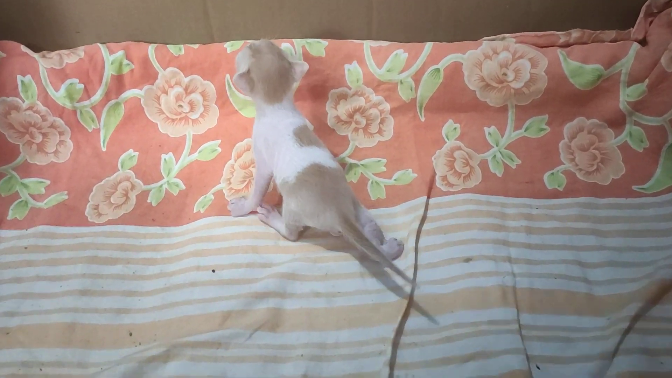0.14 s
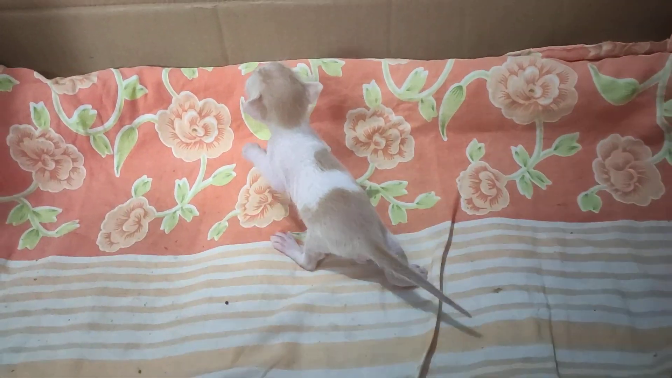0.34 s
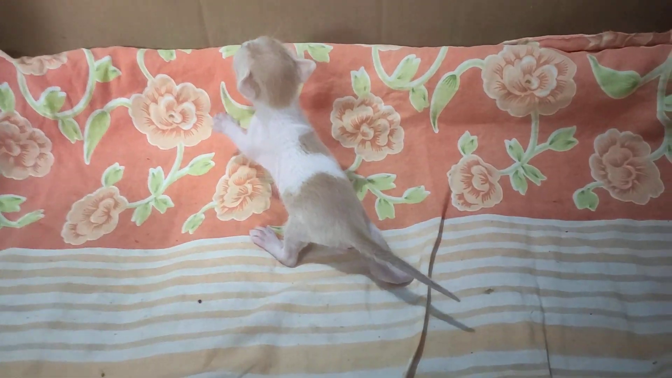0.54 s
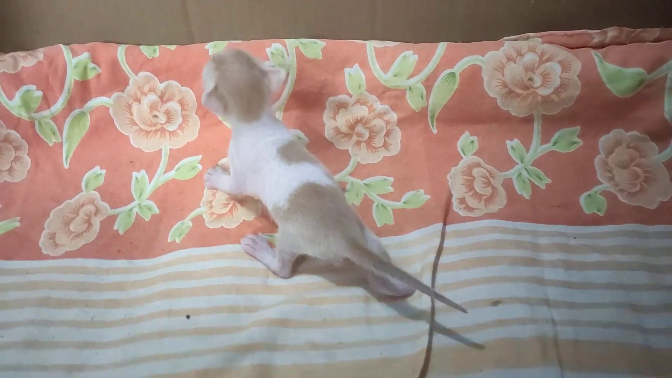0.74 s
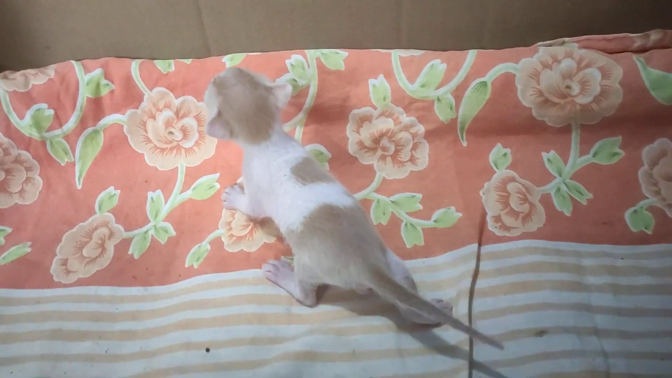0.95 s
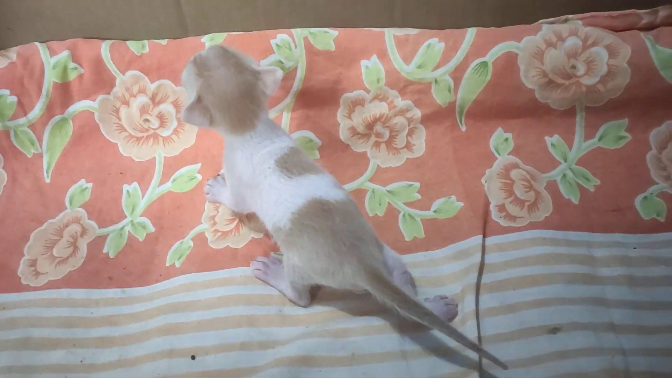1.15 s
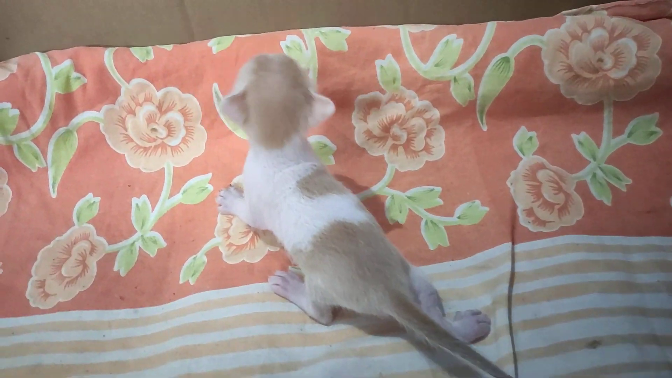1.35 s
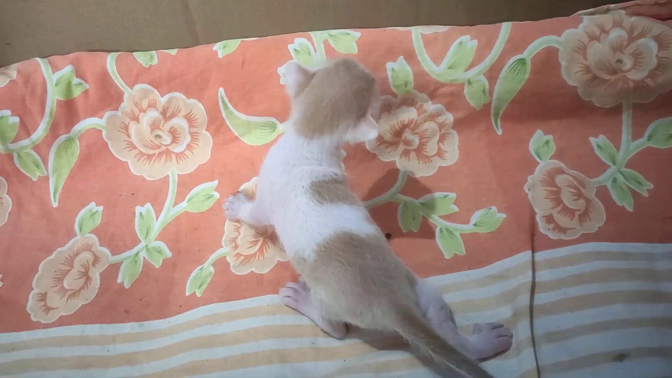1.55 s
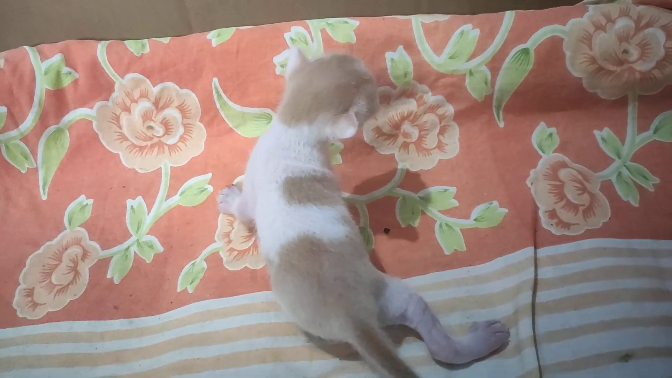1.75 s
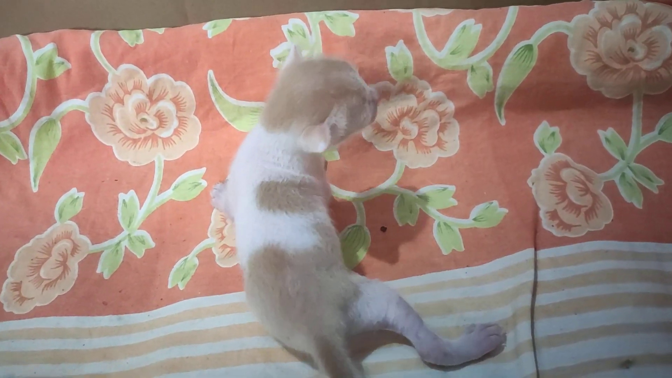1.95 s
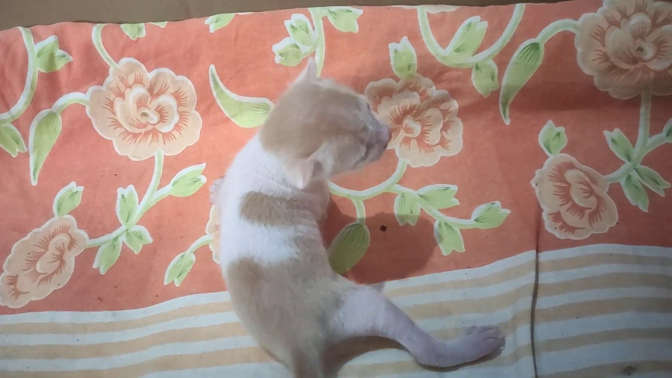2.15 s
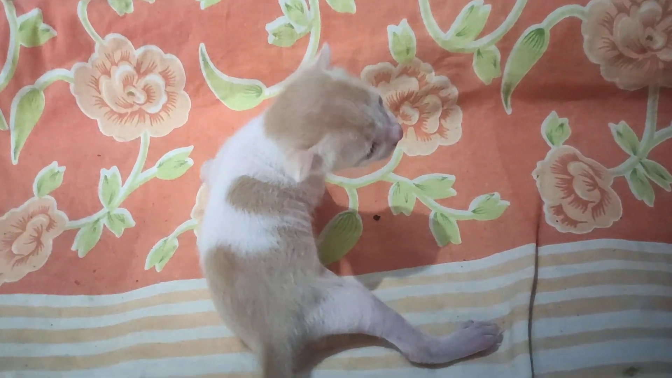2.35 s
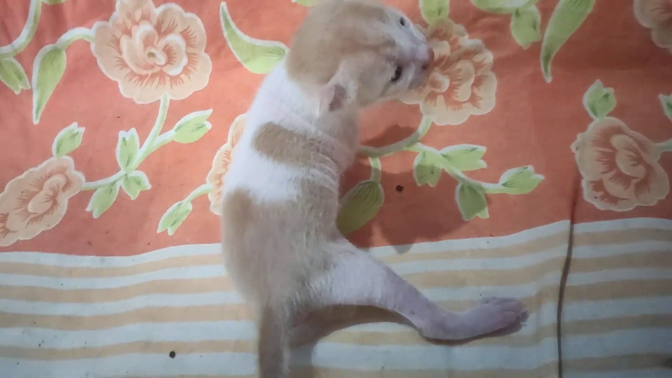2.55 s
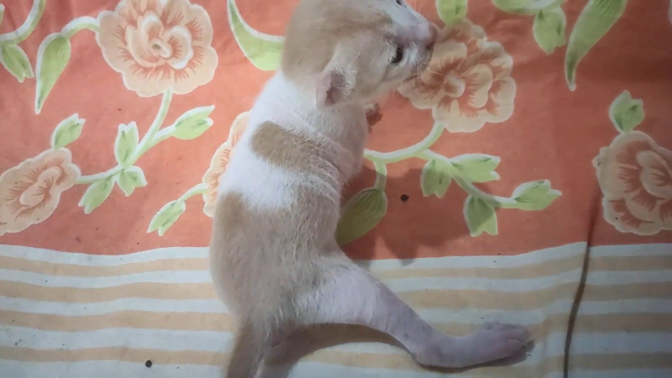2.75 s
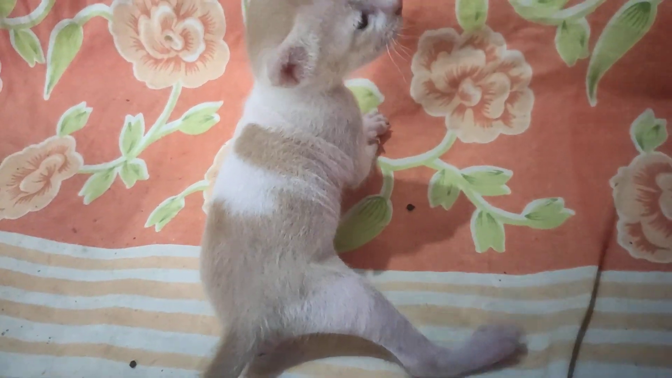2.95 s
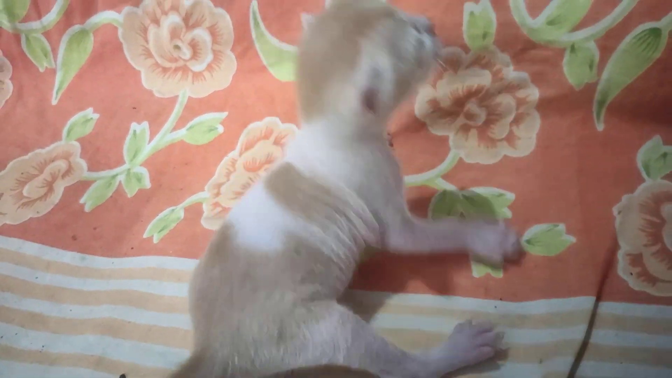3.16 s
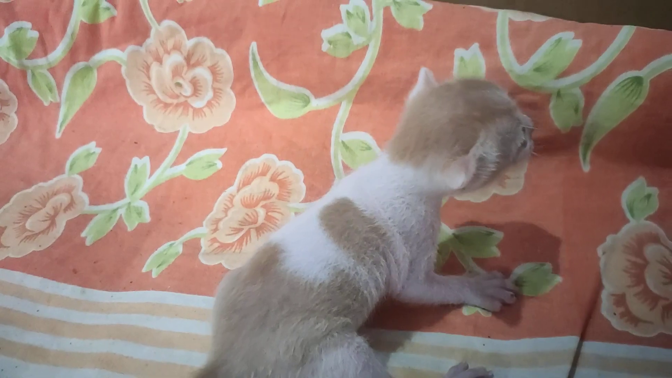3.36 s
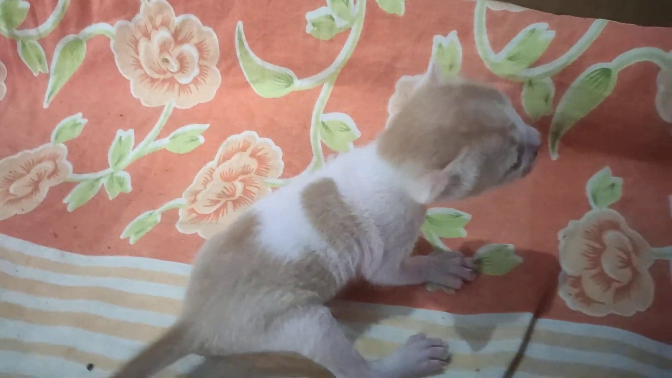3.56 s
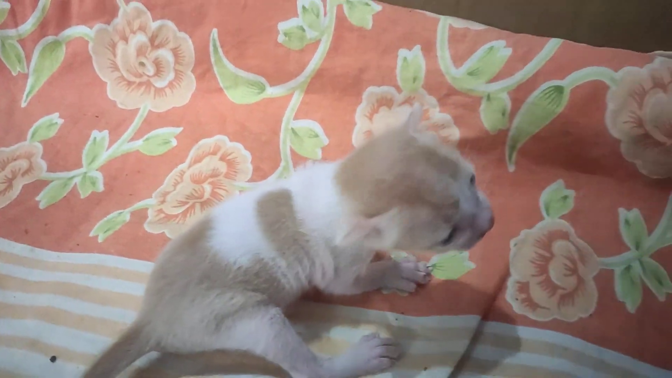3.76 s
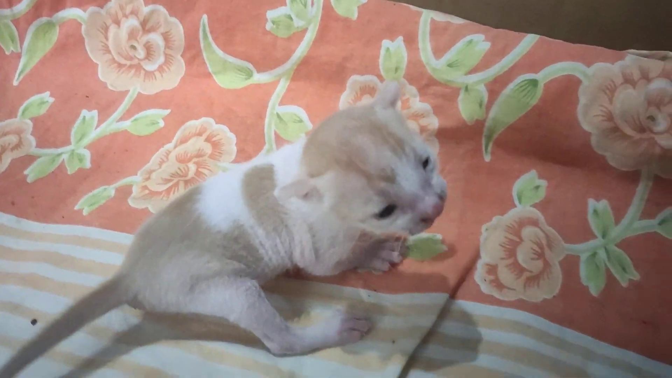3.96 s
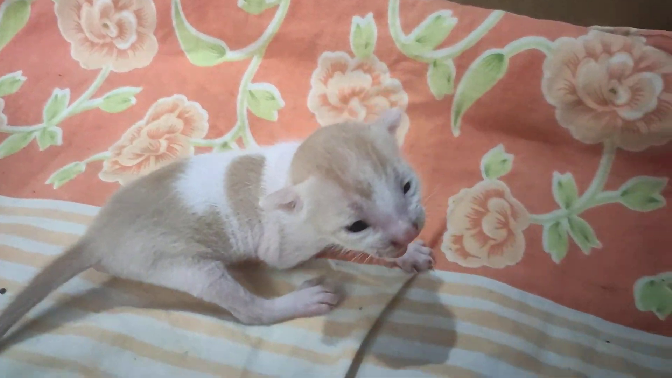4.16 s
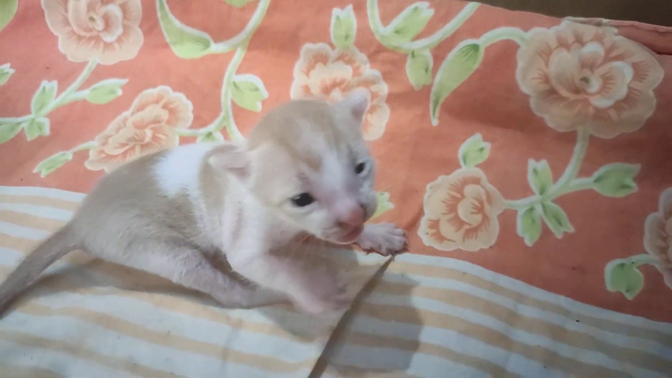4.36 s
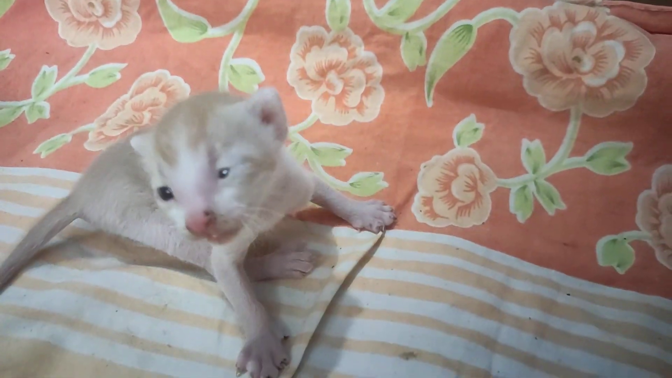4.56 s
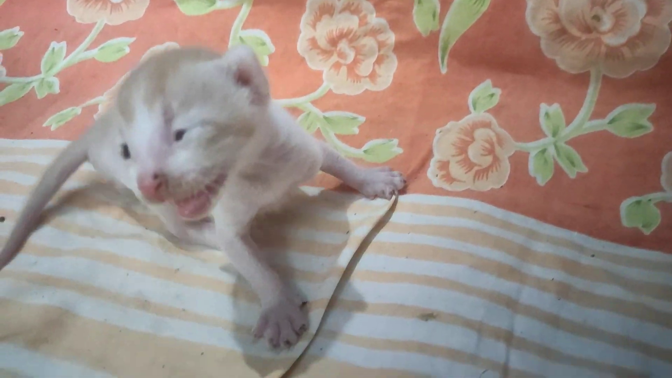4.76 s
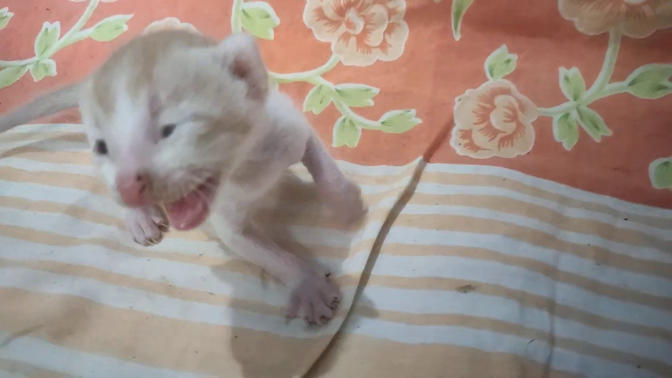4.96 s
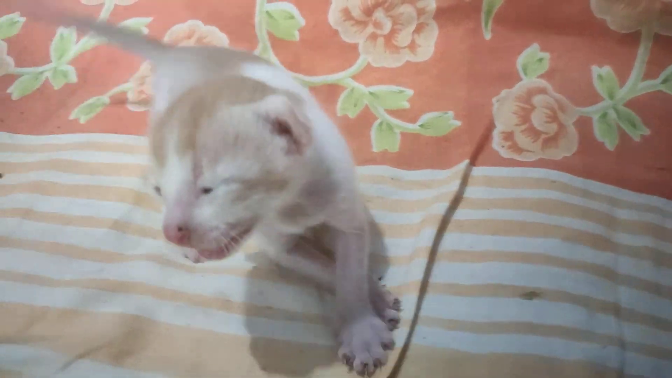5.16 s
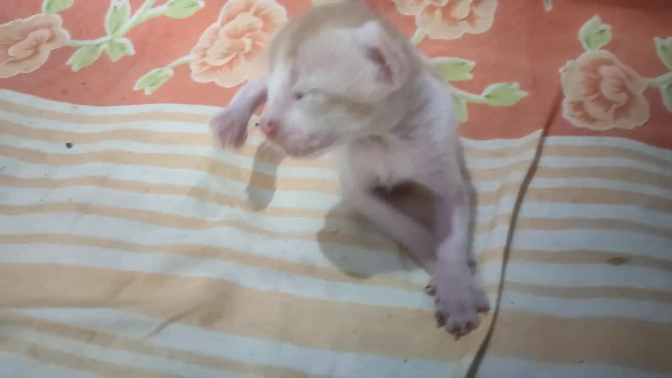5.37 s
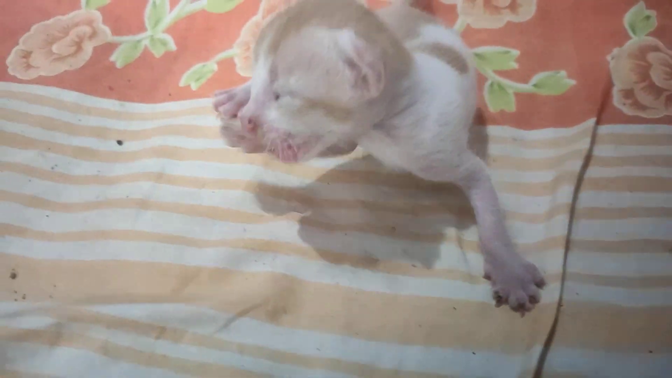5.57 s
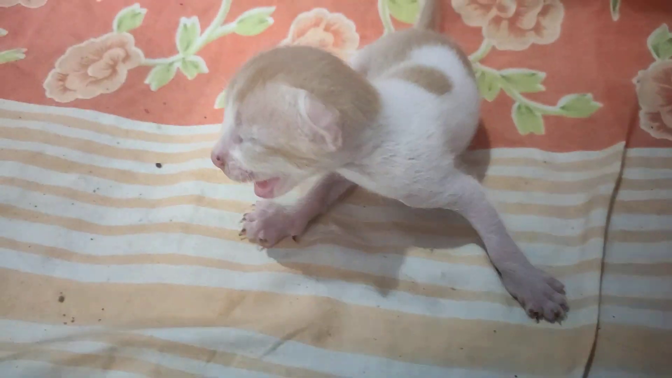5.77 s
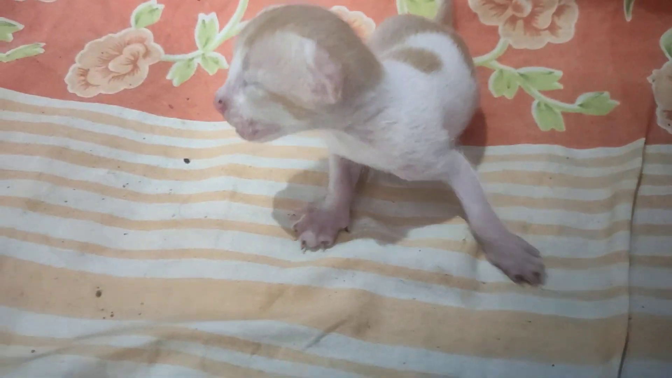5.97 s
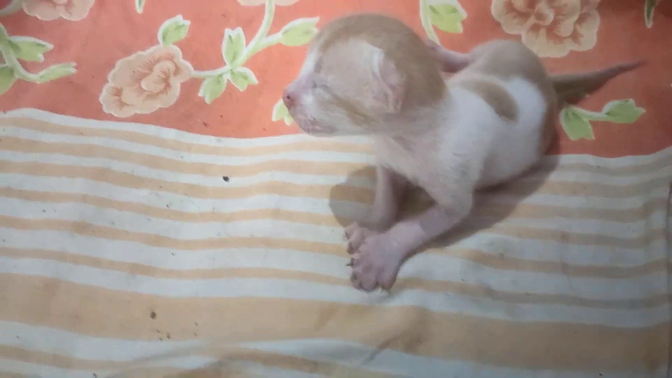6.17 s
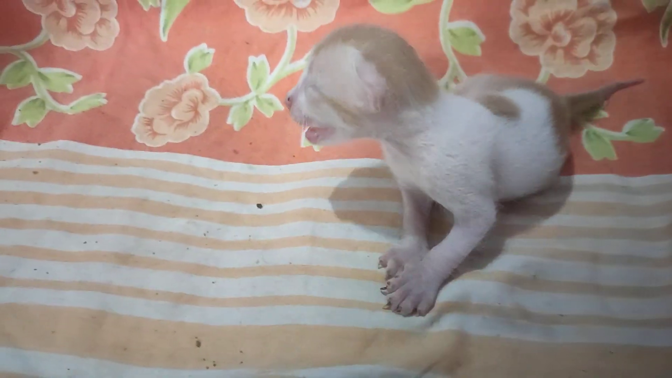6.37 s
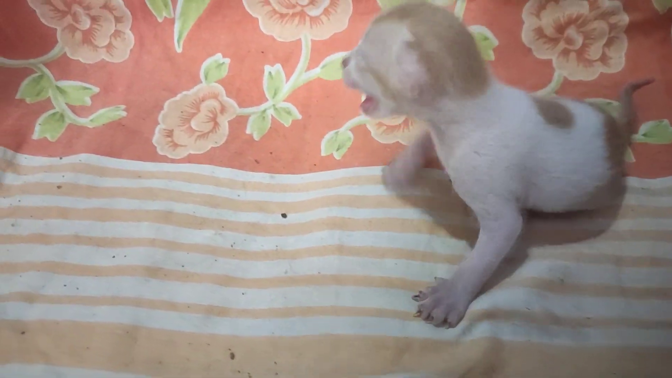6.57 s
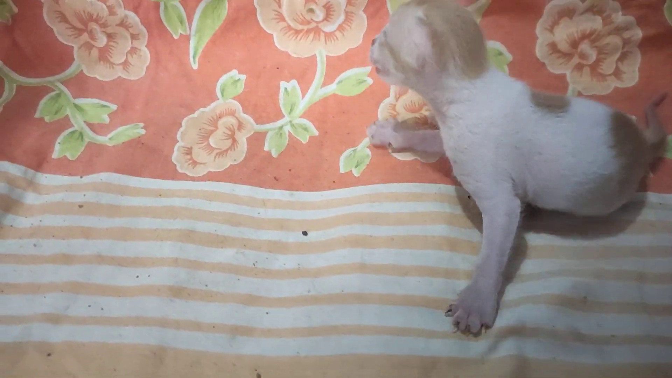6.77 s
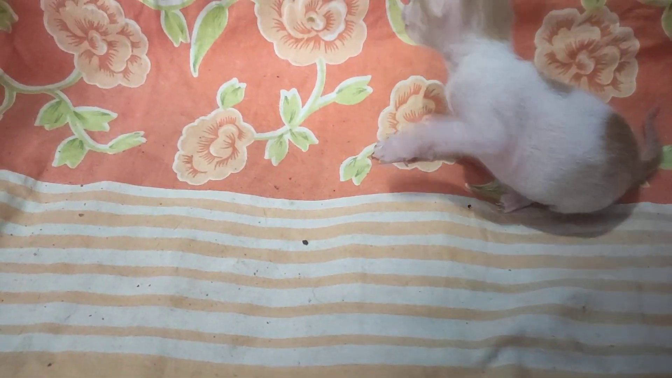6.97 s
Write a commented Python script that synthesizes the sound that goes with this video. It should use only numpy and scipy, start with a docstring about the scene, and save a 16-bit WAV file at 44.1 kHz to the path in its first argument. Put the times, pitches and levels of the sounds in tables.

```python
"""A kitten crying on a sheet

A very young kitten crawls over a cotton sheet and cries nine times, close to a stereo microphone in a small room.
Each meow adds up harmonics of a pitch that arches up and sinks away, shaped by an opening and closing mouth.
Noise pulsing with the voice makes its husky edge, and a burst of random echoes gives the room.
Shaped noise makes the draught, the room's low sound and the rustling sheet; bumps of air are filtered clicks.
"""
import sys
import numpy as np
from scipy import signal
from scipy.io import wavfile
from scipy.ndimage import uniform_filter1d, minimum_filter1d

SR = 44100
rng = np.random.default_rng(int(sys.argv[2]) if len(sys.argv) > 2 else 0)


def generate_wav(signal):
    """Clip the signal to [-1, 1] and save it as 16-bit WAV at the path in sys.argv[1]."""
    frames = np.transpose(np.atleast_2d(signal))
    scaled = np.clip(frames, -1, 1) * 32767
    pcm = np.round(scaled).astype(np.int16)
    wavfile.write(sys.argv[1], SR, pcm)


N = 310023
TIME = np.arange(N) / SR   # seconds


def from_db(db):
    """Turn decibels into gain."""
    return 10 ** (np.asarray(db) / 20)


def rms_one(x):
    """Scale a sound to an average power of 1."""
    return x / np.sqrt(np.mean(x ** 2) + 1e-20)


def in_time(rows, t):
    """Read each column of a table at times t; the first column is time."""
    s, *columns = np.transpose(rows)
    return [np.interp(t, s, column) for column in columns]


def at_hz(points, hz):
    """Read a spectrum, joining its points by straight lines over the logarithm of frequency."""
    point_hz, value = np.transpose(points)
    return np.interp(np.log(hz), np.log(point_hz), value)


def sides(pan_db):
    """Left and right gains that differ by pan_db while their total power stays the same."""
    gains = from_db(np.array([pan_db, -pan_db]) / 2)
    return gains / np.sqrt(np.mean(gains ** 2, axis=0))


def peak(hz, centre_hz, half_width_hz):
    """Bell shape of a resonance, 1 on top and one half at the half width."""
    return 1 / (1 + ((hz - centre_hz) / half_width_hz) ** 2)


def band_pass(order, low_hz, high_hz):
    """A filter that lets one band of frequencies through."""
    return signal.butter(order, [low_hz, high_hz], "band", fs=SR, output="sos")


def drift(rate, size):
    """Smooth random wandering of spread 1, heading for a new value rate times a second."""
    knots = rng.standard_normal(4096)
    return np.sqrt(3 / 2) * np.interp(np.arange(size) * rate / SR, np.arange(len(knots)), knots)


def drift_pair(rate, size):
    """Separate wandering for the left and right ports."""
    return np.array([drift(rate, size), drift(rate, size)])


def noise(spectrum, likeness, flicker_db):
    """Stereo noise in third-octave bands, each with its own level, flicker and likeness; rms 1."""
    out = 0
    white = rng.standard_normal((2, 2, N))
    edges = 18 * 2 ** (np.arange(31) / 3)
    for k, (low, high) in enumerate(zip(edges, edges[1:])):
        if high < spectrum[0][0] or low > spectrum[-1][0]:
            continue
        hz = np.sqrt(low * high)
        # neighbouring bands use different noise
        mid, side = signal.sosfilt(band_pass(2, low, high), white[k % 2])
        alike = np.clip(likeness if np.isscalar(likeness) else at_hz(likeness, hz), -1, 1)
        gain = from_db(at_hz(spectrum, hz) + flicker_db * drift(25, N))
        # the shared part is equal at both ports, the other part opposite
        out = out + gain * (np.sqrt(1 + alike) * mid + np.sqrt(1 - alike) * side * [[1], [-1]])
    return rms_one(out)


def swells(rows):
    """Add a bell-shaped swell for each row of middle time, half length and level."""
    return sum(from_db(db) * np.exp(-((TIME - s) / length) ** 2) for s, length, db in rows)


def room_noise():
    """Low noise of the room's air, with one hollow resonance made from a narrow band of noise."""
    # the room's noise: hz, relative level (dB per Hz)
    spectrum = [(25, 2), (90, -2.5), (130, 1), (180, -4.5), (290, -1), (420, -12), (600, -17), (800, -11),
                (1200, -13.5), (1600, -16), (2400, -19), (4500, -29.5), (9000, -36.5), (15000, -44)]
    # how alike the two ports are: hz, correlation (0 to 1)
    likeness = [(30, 1), (130, 1), (290, 0.91), (640, .5), (1400, 0), (3000, 0), (15000, 0)]
    # hollow resonance: hz, width_hz, level_db
    hollow = (1190, 190, -52)
    hz, width_hz, hollow_db = hollow
    band = band_pass(2, hz - width_hz / 2, hz + width_hz / 2)
    mid, side = signal.sosfilt(band, rng.standard_normal((2, N)))
    resonance = rms_one(mid + 0.89 * side * [[1], [-1]])
    return from_db(-39) * noise(spectrum, likeness, flicker_db=2.4) + from_db(hollow_db) * resonance


def draught():
    """Eddies hit each port separately, in lumps; gusts ride on the flow, adding their power."""
    # the draught's course before the overall trim: time_s, left_db, right_db
    flow = [(0.0, -27, -18), (.22, -33, -23), (.55, -39, -19), (.8, -54, -21.5), (1.05, -54, -19.5),
            (1.24, -47, -27), (1.4, -50, -23.5), (2.3, -52, -24.5), (2.6, -44, -45), (5.7, -46.5, -46),
            (5.84, -41, -33), (6.1, -49, -32), (6.46, -41, -21), (6.6, -26, -18), (6.82, -23, -21),
            (7.03, -30, -21)]
    # single gusts before the trim: time_s, half_length_s, level_db, left_minus_right_db
    gusts = [(0.163, 0.015, -21.5, -15), (0.497, .035, -27, -5), (0.61, 0.011, -12.5, -19),
             (0.737, 0.034, -35, -28), (0.882, 0.013, -10.5, -38), (1.028, 0.037, -23, -19),
             (1.374, 0.045, -19, -20), (1.466, 0.039, -19.5, -28), (1.604, .015, -25, -28),
             (1.68, 0.027, -22, -23), (1.875, 0.028, -23, -25), (2.085, 0.039, -21, -22),
             (2.31, 0.035, -27, -22), (2.779, .025, -34.5, 14), (2.902, 0.027, -42, 13),
             (3.072, 0.099, -35.5, 19), (3.595, 0.041, -32, -14), (3.789, 0.042, -24, 27),
             (3.896, 0.029, -25, -5.5), (4.008, 0.053, -32, 0), (4.467, 0.061, -33.5, -16),
             (5.19, 0.046, -27, -10), (5.33, 0.036, -27.5, -12), (5.46, 0.038, -30.5, -18),
             (5.695, .03, -36, 9), (5.93, 0.07, -28.5, -22), (6.303, 0.036, -25, -22),
             (6.415, 0.011, -19, -25), (6.506, 0.018, -13.5, -23), (6.78, 0.05, -17.5, -8),
             (6.91, 0.034, -18.5, -9)]
    # sound of air on the ports: hz, relative level (dB per Hz)
    buffet = [(12, -30), (20, 1), (46, -0.5), (113, -7.5), (241, -18), (562, -58.5), (650, -37.5),
              (840, -86), (1430, -120)]
    trim_db, lump_db, eddies_per_s = -0.5, 3.0, 60
    power = from_db(np.array(in_time(flow, TIME))) ** 2
    for *gust, pan_db in gusts:
        power += (sides(pan_db)[:, None] * swells([gust])) ** 2
    force = np.sqrt(power) * from_db(lump_db * drift_pair(eddies_per_s, N))
    return from_db(trim_db) * force * noise(buffet, 0.18, flicker_db=2.5)


def bumps():
    """Each sharp bump of air is a single dull push of pressure, inward or outward by chance."""
    # bumps on the ports: time_s, peak_db, left_minus_right_db
    air_bumps = [(0.469, -15, -31), (0.511, -16, -21), (0.594, -16, -9), (0.7, -16.5, -19),
                 (0.741, -20.5, -21), (0.83, -23, -21.0), (1.381, -23, -22), (2.07, -22, -20),
                 (2.326, -28, -21), (5.888, -25, -4), (6.408, -26.5, -25), (6.493, -16, -23),
                 (6.599, -16.5, -21), (6.77, -26, -22)]
    pushes = np.zeros((2, N))
    for (s, db, pan_db), sign in zip(air_bumps, rng.choice([-1, 1], len(air_bumps))):
        pushes[:, round(s * SR)] = sign * from_db(db) * sides(pan_db)
    dull = band_pass(3, 45, 320)
    one_push = signal.sosfilt(dull, signal.unit_impulse(SR // 10))
    # the tiny offset keeps the filter's numbers from becoming too small to compute quickly
    return signal.sosfilt(dull, pushes + 1e-18) / one_push.max()


def small_sounds():
    """Cloth rubbing under the paws and bright ticks of lips and claws, both swells of noise."""
    # paws dragging on the sheet: time_s, half_length_s, level_db
    rustles = [(.7, 0.1, -75), (3.06, 0.063, -69.5), (3.84, 0.15, -53.5), (4.5, .08, -77),
               (6.1, 0.086, -77)]
    # sound of the cloth: hz, relative level (dB per Hz)
    cloth = [(500, 2), (1500, 8), (3500, 0), (6000, -2), (9500, 0), (15000, -12)]
    # small ticks: time_s, half_length_s, level_db
    ticks = [(3.922, .01, -49), (4.494, .004, -58), (4.593, .003, -49)]
    tick_spectrum = [(4000, -14), (9000, 0), (15000, -2)]   # (hz, relative dB per Hz)
    rustle = swells(rustles) * noise(cloth, .3, flicker_db=2)
    return rustle + swells(ticks) * noise(tick_spectrum, .5, flicker_db=1.5)


def room(x):
    """A diffuse echo tail, unrelated at the two ports and dulled by soft furnishings."""
    t60_s = .35   # time to fade by 60 dB
    t = TIME[:SR // 2]
    tail = rng.standard_normal((2, len(t))) * from_db(-60 * t / t60_s) * (t > .004)
    tail = signal.sosfilt(signal.butter(1, 11000, fs=SR, output="sos"), tail)
    tail /= np.sqrt(np.sum(tail ** 2, axis=1, keepdims=True))
    return signal.fftconvolve(x, tail, axes=1)[:, :N]


def gesture(age, call, arch, jaw):
    """Pitch dips, rises and falls, taking the strength with it, while the mouth opens and closes."""
    _, level_db, opening_db, attack_s, _ = call
    dip_s, top_s, bottom_s, opening_hz, dip_hz, top_hz, bottom_hz, sag_share = arch
    open_hz, drop_hz, bright_db = jaw
    rise = np.sin(np.pi / 2 * np.clip((age - dip_s) / (top_s - dip_s), 0, 1))
    past_top = np.maximum(age - top_s, 0)
    late = np.minimum(past_top / (bottom_s - top_s), 1)
    # the fall is a gentle sag and a late collapse
    fall = sag_share * late ** 1.5 + (1 - sag_share) * late ** 4.5
    fall_hz = (top_hz - bottom_hz) * fall
    pitch = np.interp(age, [0, dip_s], [opening_hz, dip_hz]) + (top_hz - dip_hz) * rise - fall_hz
    # a power above 1 lets the voice linger softly before it swells
    softness = np.exp(-(age / attack_s) ** 1.24)
    # as the pitch falls, every cry weakens towards the same last whimper
    whimper_db, fade_hz = -47, 416
    weakness = 1 - np.exp(-(fall_hz / fade_hz) ** 1.57)
    effort_db = level_db + (opening_db - level_db) * softness + (whimper_db - level_db) * weakness
    # the resonance rises as the mouth opens; closing begins at the top of the arch
    opening_rise_hz, opening_s, closing_s = 1160, 0.057, 0.087
    closed = 1 - np.exp(-(past_top / closing_s) ** 2)
    mouth_hz = open_hz - opening_rise_hz * np.exp(-age / opening_s) - drop_hz * closed
    # slack folds sound harsher
    harsh_db_per_hz = 0.0639
    return pitch, effort_db, mouth_hz, bright_db + harsh_db_per_hz * (top_hz - pitch)


def puff(age):
    """The folds part with a short burst of air that rings the half-open mouth."""
    centre_hz, width_hz, length_s = 3450, 480, 0.005
    band = band_pass(1, centre_hz - width_hz / 2, centre_hz + width_hz / 2)
    air = rms_one(signal.sosfilt(band, signal.sosfilt(band, rng.standard_normal(SR))))
    return air[:len(age)] * np.exp(-(age / length_s) ** 2)


def meow(call, arch, jaw, notch, pose, pan, lag_s, husk):
    """One cry: harmonics of the vocal folds slide through the throat and mouth resonances."""
    # the voice's overall colour: hz, gain_db
    throat = [(600, 15.5), (1200, -14.5), (1700, 2), (2400, -1), (3300, -5.5), (4600, -5.5), (5300, -13),
              (6500, -12.5), (8200, -16.5), (9500, -22), (12000, -23), (15500, -25.5)]
    # lesser resonances that change with the pose of the head: hz, half_width_hz
    formants = [(1100, 1020), (2300, 230), (3450, 1200), (5800, 410), (8000, 400)]
    # where the left-right differences are given: hz
    pan_hz = [2300, 3670, 4690, 5600, 8640]
    mouth_depth_db, mouth_half_width_hz, notch_half_width_hz = 23.5, 930, 87
    # at the bottom of the arch the tone gives out, and the air runs on for a moment
    release_s, air_tail_s = 0.06, 0.044
    start_s, puff_db = call[0], call[-1]
    dip_s, bottom_s = arch[0], arch[2]
    first, size = round(start_s * SR), round((bottom_s + air_tail_s) * SR)
    t = TIME[:size]
    pitch, effort_db, mouth, bright_db = gesture(t, call, arch, jaw)

    # muscles cannot turn a corner: the pitch glides roundly
    pitch = uniform_filter1d(pitch, size=700, mode="nearest")
    # as the pitch sinks the folds go slack (0 to 1) and beat less evenly
    slack = np.clip((1030 - pitch) / 220, 0, 1)
    unsteady = 0.0018 * drift(69.6, size) + (0.0012 + 0.011 * slack) * drift(900, size)
    phase = 2 * np.pi * np.cumsum(pitch * (1 + unsteady)) / SR
    shimmering_db = effort_db + 1.23 * (1 + slack) * drift(131.5, size)

    voice = np.zeros((2, size))
    for k in range(1, 18):
        hz = k * pitch
        db = shimmering_db + at_hz(throat, hz)
        db += mouth_depth_db * (peak(hz, mouth, mouth_half_width_hz) - 1)
        db += bright_db * np.interp(hz, [4380, 7670, 12000, 15500], [0, 1, 1, 0])
        db += sum(gain * peak(hz, *formant) for gain, formant in zip(pose, formants))
        db += notch[1] * peak(hz, notch[0], notch_half_width_hz)
        # high harmonics waver most, and differently at each port, as the head moves
        db = db + 3.0 * np.clip((hz - 2800) / 5000, .1, 1.5) * drift_pair(45, size)
        # slack folds lose their overtones first
        db = db - slack * (16 * np.clip((hz - 4500) / 7000, 0, 1) + 2 * np.log(k))
        ports = sides(np.interp(hz, [1100] + pan_hz, [0] + list(pan)))

        # the throat smears each pulse in time, and one port hears it later (at most 2.1 radians)
        port_lag = np.clip(2 * np.pi * hz * lag_s, -2.1, 2.1)
        lag = np.pi * k * k / 4 + np.array([[1], [0]]) * port_lag
        # short waves scatter off nearby surfaces and lose their alignment
        lag = lag + np.clip((hz - 4000) / 5000, 0, 1) * drift_pair(22, size)
        # small faults in each closure blur the top harmonics, more so as the folds slacken
        lag = lag + (hz / 13000) ** 2 * (0.26 + slack) * drift(1100, size)
        voice += from_db(db) * ports * (hz < SR * .4) * np.sin(k * phase - lag)
    voice *= np.clip((bottom_s - t) / release_s + .5, 0, 1)

    # air hisses through the folds once a cycle; the soft opening is purer, and slack folds leak more
    hiss_db = pose[-1] - 19.0 + 0.48 * effort_db + 2 * slack - 5 * np.exp(-(t / dip_s) ** 2)
    ebb = np.clip((t[-1] - t) / (2 * air_tail_s), 0, 1)
    pulsing = 1 + .5 * np.cos(phase)
    voice += husk[:, first:first + size] * ebb * from_db(hiss_db) * pulsing
    voice += from_db(puff_db) * puff(t)
    fade = np.clip(t / .003, 0, 1) * np.clip((t[-1] - t) / .012, 0, 1)
    return np.pad(voice * fade, ((0, 0), (first, N - first - size)))


def scene():
    """The kitten and its echo, over the draught, the room's own noise and the rustling sheet."""
    # Each table has one row or value for each meow, except the last.
    # strength before the throat's colour: start_s, level_db, opening_level_db, attack_s, puff_db
    meows = [(.076, -8, -43, 0.033, -52), (.86, -8, -36.5, 0.05, -48), (1.626, -2.5, -44, .048, -54),
             (2.414, 1.25, -35, 0.049, -36), (3.215, -4.5, -40, 0.057, -38), (3.962, 1, -30.5, .048, -38),
             (4.791, -1, -27.5, 0.064, -35), (5.579, -4.5, -33, 0.061, -40), (6.382, -9, -43, 0.035, -50)]
    # pitch arch before smoothing: dip_s, top_s, bottom_s (after the start),
    # opening_hz, dip_hz, top_hz, bottom_hz, share of the fall that is a gentle sag (0 to 1)
    arches = [(0.012, 0.153, 0.44, 1026.0, 998.0, 1200.0, 669.0, 0.23),
              (0.016, 0.166, 0.43, 1031.0, 1020.0, 1226.0, 615.0, 0.51),
              (0.046, 0.167, 0.405, 1040.0, 1019.0, 1171.0, 510.0, 0.35),
              (0.042, 0.164, 0.437, 1083.0, 1005.0, 1183.0, 479.0, 0.21),
              (0.073, 0.225, 0.397, 1095.0, 1077.0, 1174.0, 570.0, 0.71),
              (0.045, 0.173, 0.457, 1175.0, 1057.0, 1209.0, 438.0, 0.29),
              (0.081, 0.171, 0.41, 1107.0, 1070.0, 1137.0, 580.0, 0.59),
              (0.06, 0.171, 0.41, 1095.0, 1053.0, 1149.0, 540.0, 0.61),
              (0.049, 0.146, 0.388, 1081.0, 1054.0, 1157.0, 448.0, 0.28)]
    # mouth: open_resonance_hz, drop_on_closing_hz, brightness_db
    mouths = [(4395, 450, 6), (4750, 830, 9), (4540, 720, -1.5), (4375, 630, 2.5), (4450, 550, 3.5),
              (4165, 400, 7.5), (3850, 320, 4.5), (4090, 470, 8), (4400, 670, 7)]
    # narrow hollow (in one cry a slight bump, in one nothing) that harmonics cross: hz, gain_db
    notches = [(4630, -4.5), (4560, -8), (4604, -3.5), (4330, -8.5), (4300, -5), (4300, 0.5), (4230, -5.5),
               (4160, -4.5), (3960, 0)]
    # pose of the head: gain_db of each of the five lesser resonances, then relative huskiness_db
    poses = [(4.5, 0, 1.5, 1, 9.5, -18), (6.5, 4, 2, 2, 6.5, -20.5), (4, -9, -1.5, 1, 17.5, -25),
             (-5, -0.5, 1, -4.5, 6, -29), (6, -9, -0.5, -2.5, 6.5, -21.5), (2, -10.5, -0.5, 4, -5, -20),
             (-3, -4, 3, 3, -14, -22), (9, -8, -4.5, 12, -8, -21.5), (5, -6, 0, 4, -3, -20)]
    # left_minus_right_db at each of the five frequencies listed in meow()
    pans = [(-7.5, 1.5, -3.5, -6, -2), (-8.5, 1.5, 3, 0, -2.5), (-1, -6.5, 7, -3, 3.5),
            (-2, -4.5, 8, -9, 7), (-7.5, 2, 8.5, -2, 10), (-3, 0.5, 1.5, 0, 3), (-4.5, -12, 10, -7, -3),
            (0.5, -11, 8, -7.5, -4), (-5, -6.5, 7.5, -5.5, -8)]
    # how much later the left port hears it, negative if earlier, before meow() limits it: lag_s
    left_lags = [.000115, -0.0055, .000045, .00002, -.00004, .000065, -0.0056, .00017, .0001]
    # turbulence at the vocal folds: hz, relative level (dB per Hz)
    turbulence = [(900, -25.5), (2000, -24), (2900, -23.5), (3700, -7.5), (4400, 19), (5300, -4), (6500, 2),
                  (9000, 12.5), (12500, -11), (15500, -6)]
    husk = noise(turbulence, 0.79, flicker_db=2.0)
    cries = zip(meows, arches, mouths, notches, poses, pans, left_lags)
    kitten = sum(meow(*cry, husk) for cry in cries)
    echo = from_db(-18) * room(kitten)
    return kitten + echo + draught() + bumps() + room_noise() + small_sounds()


def record(dry):
    """A limiter ducks the highest peaks; the top is then cut steeply."""
    cutoff_hz = 15650
    headroom = np.minimum(1, .93 / (np.abs(dry).max(axis=0) + 1e-9))
    gain = uniform_filter1d(minimum_filter1d(headroom, size=600), size=600)
    steep = signal.ellip(18, .1, 90, cutoff_hz, fs=SR, output="sos")
    return signal.sosfilt(steep, dry * gain)


dry = scene()
out = record(dry)
generate_wav(out)
```